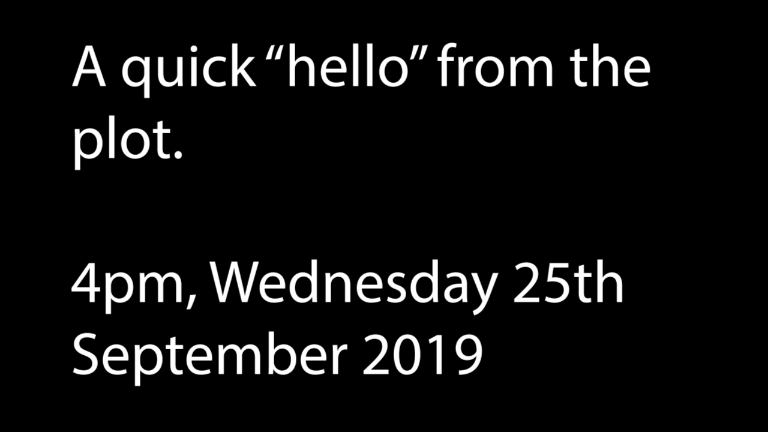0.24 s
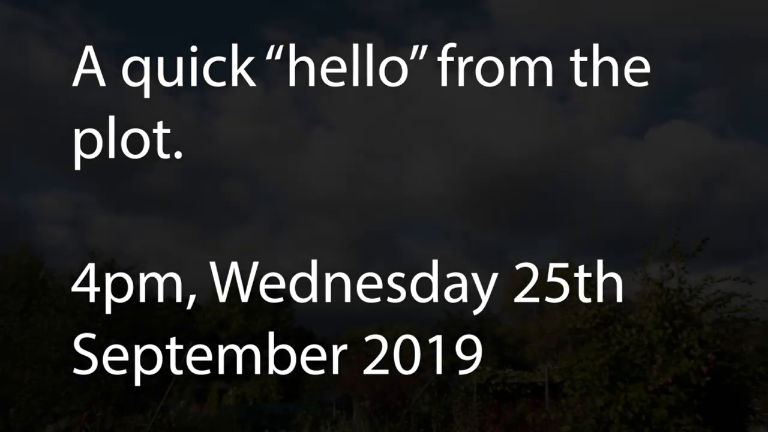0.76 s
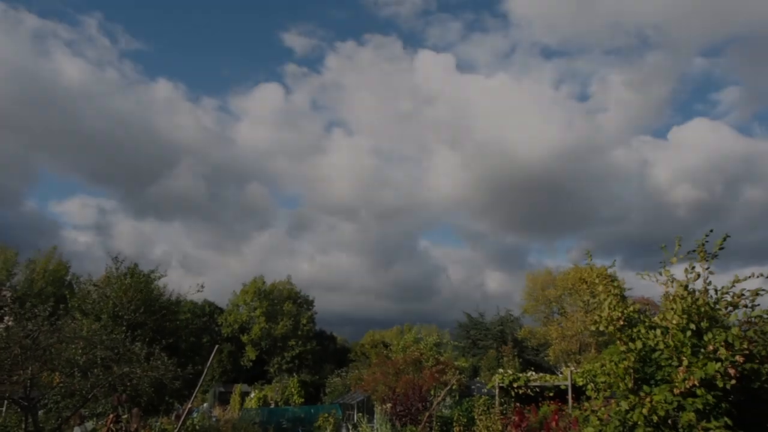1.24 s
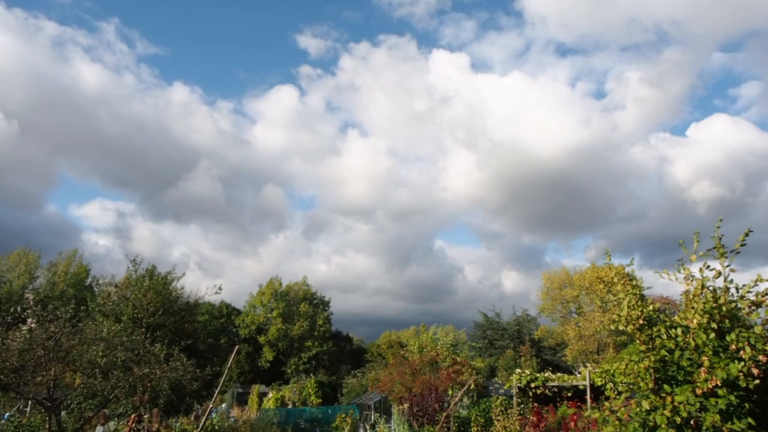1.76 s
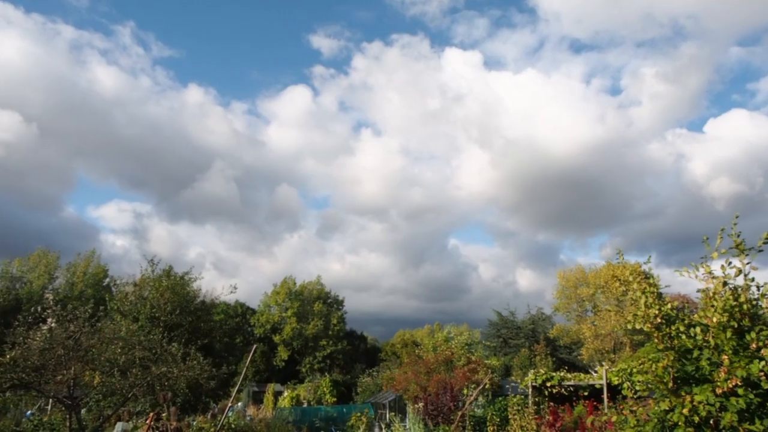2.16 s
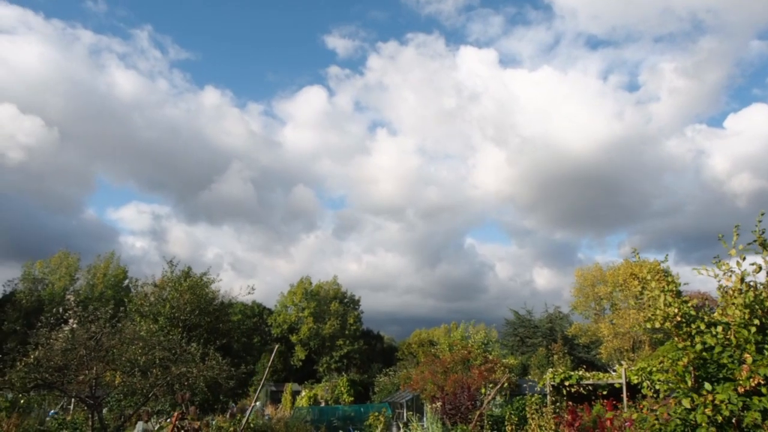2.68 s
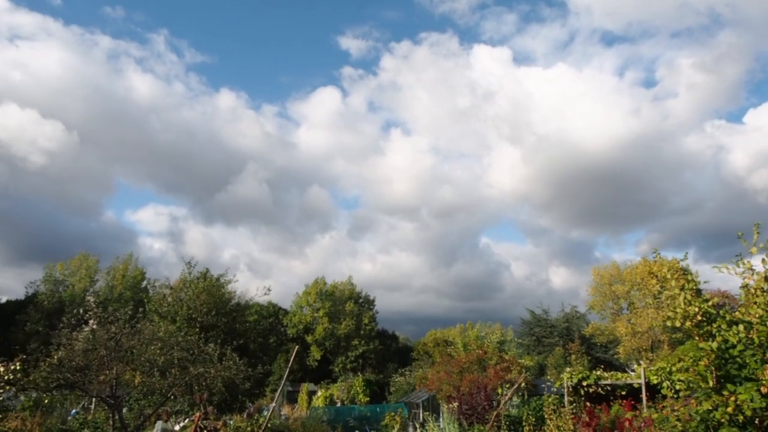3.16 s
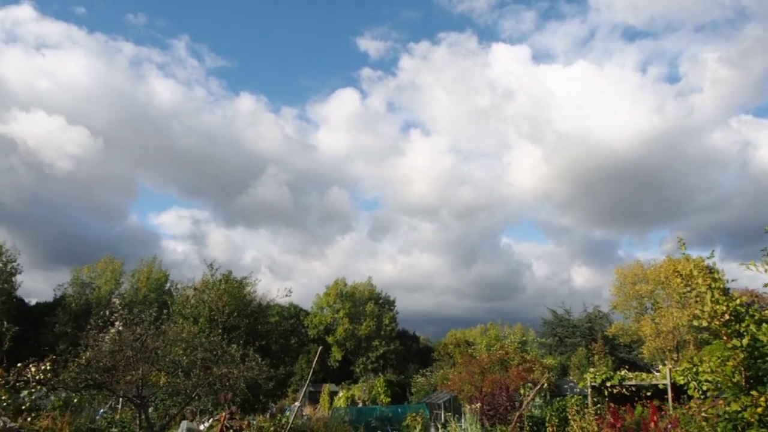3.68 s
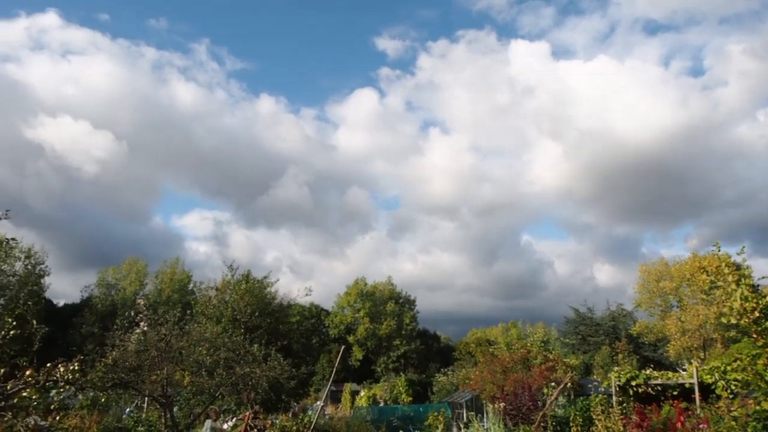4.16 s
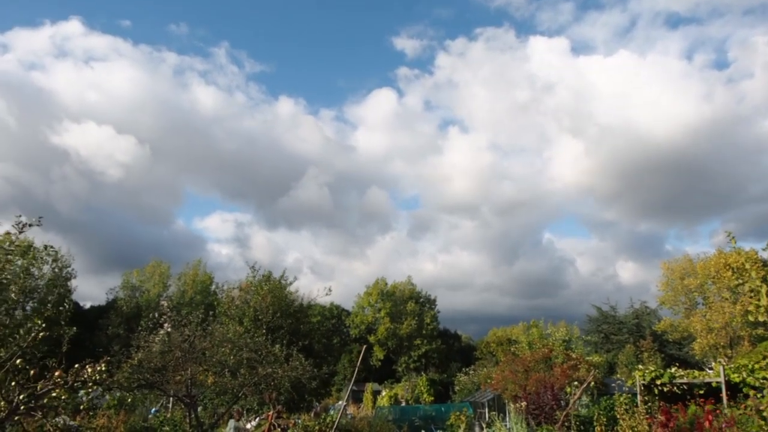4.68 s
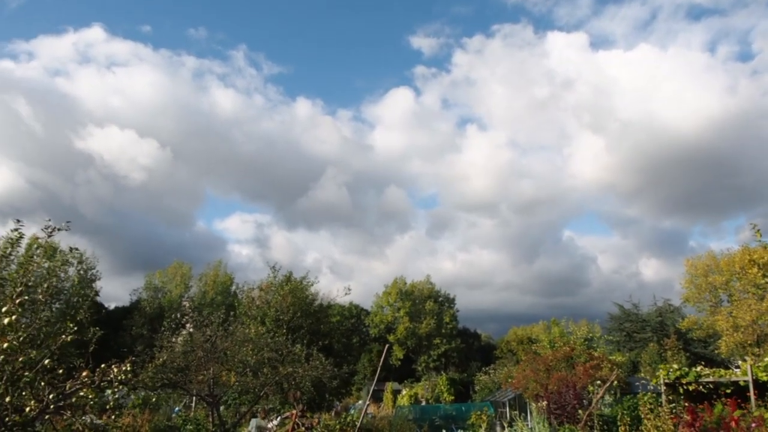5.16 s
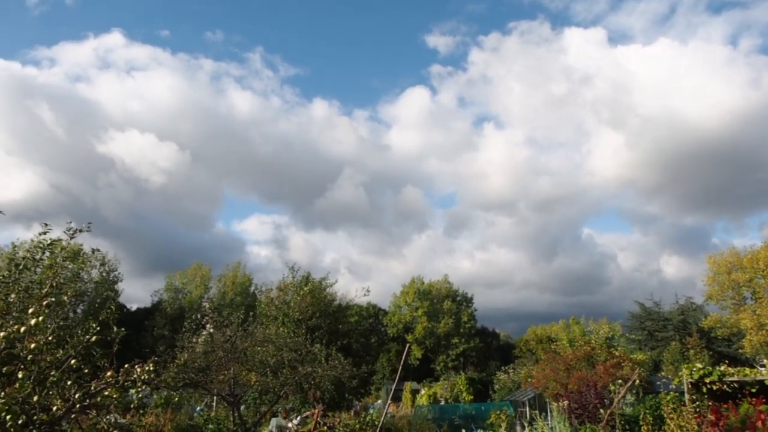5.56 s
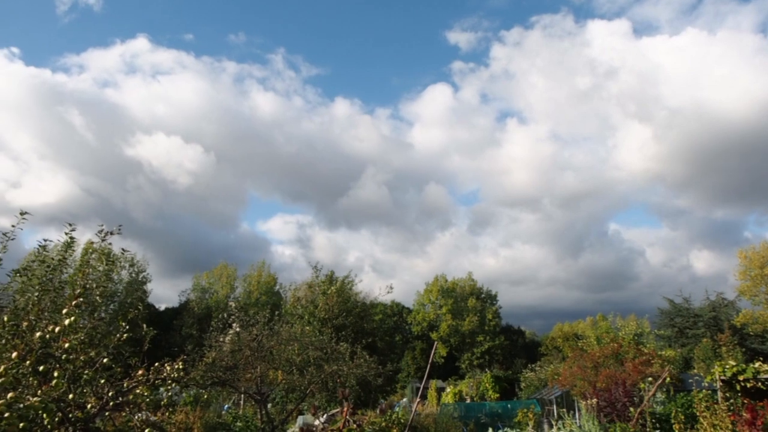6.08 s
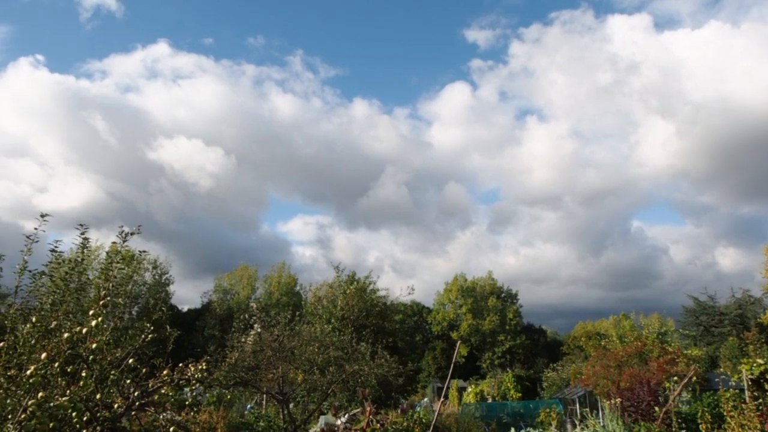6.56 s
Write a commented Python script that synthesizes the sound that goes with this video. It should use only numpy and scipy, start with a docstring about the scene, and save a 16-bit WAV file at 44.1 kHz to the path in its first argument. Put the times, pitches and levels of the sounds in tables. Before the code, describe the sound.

After a brief silence, outdoor air fades in: steady leaf hiss slightly to the right and a dull distant roar slightly to the left. Strong gusts flutter and thump directly on the stereo microphone, first left, later right, then left again. They stop before four seconds, leaving rustling trees, a faint quick bird chirp, a soft knock, weaker left-side buffeting and another couple of bird notes.

```python
"""Wind among garden trees at two close microphone ports, rising from silence by a straight fade-in
that raised early levels of roar and leaves fill out. Leaf hiss (shaped noise and ticks, from the right)
and a dull far roar (shaped noise, from the left) run throughout. Eddies, made as short uneven pressure
swings, thump each port on its own, strongly up to 3.8 s. Then come faint gliding bird whistles near 4 s,
a soft knock of damped modes at 4.7 s, weaker eddies chiefly on the left, and more bird notes from 6 s."""
import sys
import numpy as np
from scipy import signal
from scipy.fft import rfft, irfft
from scipy.io import wavfile
from scipy.ndimage import uniform_filter1d

SR = 44100
rng = np.random.default_rng(int(sys.argv[2]) if len(sys.argv) > 2 else 0)


def wav_record(signal):
    """Record a signal, one row per channel, as 16-bit PCM in the file named by sys.argv[1]."""
    frames = np.transpose(np.atleast_2d(signal))
    bounded = np.clip(frames, -1, 1)
    # unit amplitude maps onto the largest positive 16-bit level
    quanta = np.round(bounded * 32767).astype(np.int16)
    wavfile.write(sys.argv[1], SR, quanta)


def voltage_ratio(decibels):
    """Convert decibels (scalar or array-like) to amplitude ratios, 20 dB per decade."""
    exponent = np.asarray(decibels, float) / 20
    return 10 ** exponent


N = 301203
T = np.arange(N) / SR


def evened(x):
    """Normalization: scales a signal to an rms of 1."""
    return x / np.sqrt(np.mean(x ** 2) + 1e-20)


def read(points, hz):
    """Interpolation: reads a curve on a log-frequency axis."""
    f, value = np.transpose(points)
    return np.interp(np.log(hz + 1), np.log(f + 1), value)


def add(mix, s, sound):
    """Superposition: adds a sound to the mix at time s."""
    part = mix[..., round(s * SR):][..., :sound.shape[-1]]
    part += sound[..., :part.shape[-1]]


# A quick flick inside each strong eddy: level relative to the eddy at -8 dB, further dB per dB of eddy
# level, and width in flutter periods.
SNAP_DB, SNAP_GROWTH, SNAP_TURNS = -8.5, 0.3, 0.081


def eddy(hz, ms, chance, sharp, wander, spread, push, snap=0):
    """Phase modulation: uneven, peaky pressure swings on a push of half their rate, in a Gaussian bell."""
    u = np.arange(-4 * spread * ms, 4 * spread * ms, 1000 / SR) / ms
    uneven = u + wander * np.sin(np.pi * (u + 2 * chance[1]))
    turn = 2 * np.pi * (chance[0] + hz * ms / 1000 * uneven)
    swing = np.cos(turn + sharp * np.sin(turn + 2 * np.pi * chance[2]))
    bell = np.exp(-.5 * (u / spread) ** 2)
    slow_push = push * np.sqrt(bell) * np.cos(turn / 2 + 2 * np.pi * chance[2])
    x = (u + chance[1] * spread / 2) * ms * hz / 1000 / SNAP_TURNS
    flick = x * np.exp(.5 - .5 * x ** 2)  # one push and pull, peaking at 1
    return snap * flick + bell * swing + slow_push


# The strongest eddies. Each row: centre in seconds, port, level of the swing before the low cut in dB,
# flutter in Hz, length scale in ms.
STRONG_EDDIES = [(0.935, "left", -22, 141, 18), (1.078, "left", -21, 170, 19),
                 (1.111, "left", -15, 173.8, 8.2), (1.136, "left", -20, 210, 12.6),
                 (1.198, "left", -21, 152, 18), (1.224, "left", -20.5, 194, 21),
                 (1.253, "left", -19, 296.4, 5), (1.265, "left", -20.5, 170, 10),
                 (1.354, "left", -27, 170, 7.9), (1.375, "left", -18, 192, 9.2),
                 (1.4, "left", -14, 138, 25.5), (1.434, "left", -14, 340, 11), (1.468, "left", -20, 150, 7),
                 (1.48, "left", -23, 150, 8.9), (1.569, "left", -25, 174, 16),
                 (1.684, "left", -20, 145, 8.9), (1.701, "left", -13.5, 133, 14.4),
                 (2.094, "right", -17, 170, 6.5), (2.158, "left", -9.5, 168, 6.7),
                 (2.172, "left", -16, 192, 11), (2.187, "left", -17.5, 116, 18),
                 (2.206, "left", -16, 141, 14), (2.232, "left", -14.5, 186, 9.8),
                 (2.281, "left", -25, 209, 7.6), (2.885, "right", -16, 241, 5.9),
                 (2.953, "right", -13.5, 188, 13), (2.996, "right", -15, 270, 16),
                 (3.08, "right", -12.5, 305, 6), (3.096, "right", -15, 318, 14.8),
                 (3.11, "right", -15, 372, 8.9), (3.141, "right", -31, 169, 8),
                 (3.177, "right", -16, 286, 7), (3.184, "left", -19, 165, 24),
                 (3.232, "right", -23, 177, 18), (3.336, "left", -18.5, 180, 7.4),
                 (3.374, "left", -19, 241, 8.8), (3.4, "left", -17, 189, 15),
                 (3.446, "left", -17.5, 216, 6.2), (3.579, "left", -21, 143, 16),
                 (3.662, "left", -22, 90, 13), (3.718, "left", -15.5, 157, 10.3),
                 (3.744, "left", -22.5, 130, 10), (4.58, "right", -32.5, 75, 19),
                 (5.498, "left", -34, 94, 17), (5.714, "left", -29, 123, 11),
                 (5.827, "left", -26.5, 121, 13.4), (5.85, "left", -28, 125, 7.4),
                 (6.061, "left", -31, 142, 16), (6.113, "left", -30, 118, 14.6),
                 (6.202, "left", -30.5, 100, 11.5), (6.251, "left", -35, 130, 6.2),
                 (6.329, "left", -31, 150, 5.5), (6.589, "left", -28.5, 130, 12)]


def strong_eddies():
    """Turbulent pressure: single large eddies tumble over one port at a time."""
    out = np.zeros((2, N))
    for (s, port, db, hz, ms), chance in zip(STRONG_EDDIES, rng.random((len(STRONG_EDDIES), 3))):
        sharp = np.clip(1.0 + 0.033 * (db + 4.5), 0, 2)  # stronger eddies swing more sharply
        snap = voltage_ratio(SNAP_DB + SNAP_GROWTH * (db + 8))
        swing = eddy(hz, ms, chance, sharp, wander=0.064, spread=0.34, push=0.33, snap=snap)
        add(out[int(port == "right")], s - len(swing) / 2 / SR, voltage_ratio(db) * swing)
    return out


# Level of the crowd of small eddies before the low cut.
# Each row: time in seconds, left port in dB, right port in dB.
GUST_LEVELS = [(0.7, -67, -60), (0.85, -31.5, -55), (1.2, -27, -52), (1.6, -36.5, -36), (1.85, -41, -42),
               (2.05, -38.5, -36), (2.2, -28.5, -39), (2.4, -32.5, -42), (2.5, -60, -87), (2.8, -68, -40.5),
               (3.1, -31, -20), (3.3, -39, -32.5), (3.55, -31, -37), (3.74, -41, -45), (3.79, -54, -35),
               (3.88, -41, -34), (4.1, -61, -54), (4.25, -62, -69), (5.4, -66, -70), (5.6, -47, -66),
               (5.85, -42, -64), (5.95, -49, -68), (6.15, -40, -61), (6.3, -53, -66), (6.38, -40, -64),
               (6.46, -54, -64), (6.6, -38.5, -69), (6.83, -62, -70)]
SMALL_PER_S, SMALL_SPREAD_DB = 190, 5  # mean rate in each port, scale of the random sizes
SMALL_TILT_DB = -2.5  # dB per octave of flutter when the gust level is -22 dB
BRIGHTEN = 0.13  # stronger gusts favour fast flutter: dB per octave per dB
CLUMP_DB = 3  # slow random rise and fall of the sizes, so that the crowd comes in bunches


def small_eddies():
    """Poisson statistics: a random crowd of small eddies whose level and tilt follow the gusts."""
    s, *level_db = np.transpose(GUST_LEVELS)
    gust_db = np.array([np.interp(T, s, db) for db in level_db])
    flutter_hz = np.geomspace(66, 340, num=32)
    kind = rng.integers(0, len(flutter_hz), (2, N))
    size_db = SMALL_SPREAD_DB * np.minimum(rng.exponential(1, (2, N)), 2.5)
    occurs = rng.random((2, N)) < SMALL_PER_S / SR
    tilt_db = SMALL_TILT_DB + BRIGHTEN * np.clip(gust_db + 22, -30, 10)
    bunches = evened(uniform_filter1d(rng.standard_normal((2, N)), size=900, axis=1))
    octaves = np.log2(flutter_hz[kind] / 120)
    size = occurs * voltage_ratio(size_db + tilt_db * octaves + CLUMP_DB * bunches)
    crowd = np.zeros((2, N))
    for k, hz in enumerate(flutter_hz):
        # about one swing each
        swing = eddy(hz, 1300 / hz, rng.random(3), sharp=0.78, wander=0.19, spread=0.58, push=0)
        crowd += signal.oaconvolve(size * (kind == k), swing[None], "same", axes=1)
    return evened(crowd) * voltage_ratio(gust_db)


LOW_CUT_HZ = 57  # the microphone rolls off below this


def buffeting():
    """Wind noise: pressure of air tumbling over each port, through the microphone's high-pass response."""
    pressure = strong_eddies() + small_eddies()
    low_cut = signal.butter(3, LOW_CUT_HZ, "highpass", fs=SR, output="sos")
    return signal.sosfilt(low_cut, pressure)


# Level curves of far roar and leaves, relative to each layer's own level; the raised early points
# fill out the straight fade-in, the rest is slow swell.
# Each row: time in seconds, far roar in dB, leaves in dB.
LAYER_LEVELS = [(0.7, 2.5, 4.5), (1.3, -1, 2), (1.7, -0.9, 1.54), (3.1, -0.3, 0.6), (3.4, -0.8, 2),
                (4.5, 0.34, 0.25), (5.7, -0.5, 0), (6.83, -1, 1.5)]


def layer_levels():
    """Amplitude modulation: level curves in dB of the far roar and the leaves."""
    s, roar_db, leaves_db = np.transpose(LAYER_LEVELS)
    return np.interp(T, s, roar_db), np.interp(T, s, leaves_db)


def airy(colour, alike, left_late_s, patchy_db, flicker_db, right_bright_db=0):
    """Interaural coherence: partly shared noise spectra, with patches and a flicker common to all pitches."""
    frames, hz = N // 128 + 5, np.fft.rfftfreq(512, 1 / SR)
    a, b, c, d, patches = rng.standard_normal((frames, 257, 5)).T
    patches = uniform_filter1d(uniform_filter1d(patches, size=8, axis=0), size=24, axis=1)
    flicker = evened(uniform_filter1d(rng.standard_normal(frames), size=30))
    same = np.clip(read(alike, hz), 0, 1)[:, None]
    late = np.exp(-2j * np.pi * hz * left_late_s)[:, None]
    right, own = a + 1j * b, c + 1j * d
    left = same * late * right + np.sqrt(1 - same ** 2) * own
    # the ports differ in a band around 9 kHz
    band = np.exp(-np.log2(hz / 9000 + 1e-9) ** 2 / 0.15)[:, None]
    port_db = np.array([-.5, .5])[:, None, None] * right_bright_db * band
    level_db = read(colour, hz)[:, None] + patchy_db * evened(patches) + flicker_db * flicker
    z = np.array([left, right]) * voltage_ratio(port_db + level_db)
    return evened(signal.istft(z, nperseg=512, noverlap=384)[1][:, :N])


# Spectrum of the leaves. Each row: frequency in Hz, relative spectral density in dB.
LEAF_SPECTRUM = [(300, -9), (900, -6.5), (1500, -1.5), (2500, -1), (3600, -3.5), (5000, -9), (7000, -12),
                 (8300, -9), (9800, -12), (11500, -19.5), (13500, -22), (16500, -31)]
# Likeness of the leaf hiss in the two ports. Each row: frequency in Hz, coherence from 0 to 1.
LEAF_LIKENESS = [(1000, 0.9), (2200, 0.49), (3300, 0.62), (5000, 0.59), (6000, 0.49), (9500, 0.3),
                 (12000, 0.061)]
LEAVES_DB, RUSTLE_DB = -43, -54.5  # rms of hiss and of ticks, before the level curve


def leaves():
    """Sum of many impacts: a dense hiss, right first, with single leaves ticking as filtered impulses."""
    hiss = airy(LEAF_SPECTRUM, LEAF_LIKENESS, 0.00011, 0.38, 0.58, right_bright_db=1.5)
    size = voltage_ratio(3.1 * np.minimum(rng.exponential(1, (2, N)), 4))
    size *= rng.random((2, N)) < 900 / SR  # 900 ticks per second in each port
    z = rfft(size * rng.choice([-1., 1.], (2, N)), axis=1)
    ticks = irfft(z * voltage_ratio(read(LEAF_SPECTRUM, np.fft.rfftfreq(N, 1 / SR))), N, axis=1)
    level_db = layer_levels()[1] + np.array([[-.4], [.4]])  # right port louder
    return voltage_ratio(level_db) * (voltage_ratio(LEAVES_DB) * hiss + voltage_ratio(RUSTLE_DB) * evened(ticks))


# Spectrum of the far roar. Each row: frequency in Hz, relative spectral density in dB.
ROAR_SPECTRUM = [(25, -13), (60, -13.5), (130, -7), (250, -7.5), (500, -11), (620, -3.5), (820, -2),
                 (1020, -1), (1150, -5.5), (1300, -19), (2000, -17), (4000, -55)]
ROAR_DB = -41.5  # rms before the level curve


def far_roar():
    """Spectral filtering: wind in far treetops, perhaps with a road, dull and nearly alike, left first."""
    flat = airy([(1, 0), (2, 0)], [(150, 0.99), (600, 0.88), (1300, 0.83)], -0.000079, 0.82, 0.2)
    z = rfft(flat, axis=1)
    coloured = irfft(z * voltage_ratio(read(ROAR_SPECTRUM, np.fft.rfftfreq(N, 1 / SR))), N, axis=1)
    level_db = layer_levels()[0] + np.array([[.4], [-.4]])  # left port louder
    return voltage_ratio(ROAR_DB + level_db) * evened(coloured)


# Bird notes. Each row: start in seconds, length in ms, start pitch in Hz, end pitch in Hz,
# direct level averaged over the ports in dB, left minus right in dB.
BIRD_NOTES = [(3.963, 33, 5150, 5100, -51, -10), (3.996, 28, 4550, 4000, -46, 0),
              (4.031, 14, 3650, 4020, -49, -10), (4.042, 11, 4000, 4080, -42, -12),
              (5.99, 15, 2800, 4300, -49, -5), (6.021, 11, 4270, 3750, -45, -6),
              (6.03, 11, 3800, 4600, -45, -2), (6.042, 11, 3950, 3600, -48, -8),
              (6.51, 84, 3300, 2980, -50, 0)]


def birds():
    """Frequency modulation: short gliding whistles, smeared by a few echoes among the trees."""
    out = np.zeros((2, N))
    for s, ms, start_hz, end_hz, db, pan_db in BIRD_NOTES:
        hz = np.linspace(start_hz, end_hz, round(ms * SR / 1000))
        note = np.sin(2 * np.pi * np.cumsum(hz) / SR) * signal.windows.tukey(len(hz), .85)
        add(out, s, voltage_ratio(db + np.array([[pan_db / 2], [-pan_db / 2]])) * note)
    echoes = np.zeros((2, 3000))
    echoes[:, 0] = 1  # direct sound
    echoes[[[0], [1]], rng.integers(200, 3000, (2, 8))] = 0.12 * rng.choice([-1., 1.], (2, 8))
    return signal.oaconvolve(out, echoes, axes=1)[:, :N]


KNOCK_S, KNOCK_DB = 4.7, -34  # start, and level added to both modes
# Each row: frequency in Hz, relative level in dB, time to decay by 60 dB in seconds.
KNOCK_MODES = [(130, -3, 0.13), (550, 5.5, 0.072)]


def knock():
    """Modal decay: one soft dull bump nearby, two damped modes with a gradual onset, alike in both ports."""
    t, out = np.arange(SR // 5) / SR, np.zeros(N)
    ring = sum(voltage_ratio(db - 60 * t / t60) * np.sin(2 * np.pi * hz * t) for hz, db, t60 in KNOCK_MODES)
    onset = 1 - np.exp(-t / 0.0085)
    add(out, KNOCK_S, voltage_ratio(KNOCK_DB) * ring * onset)
    return out


def scene():
    """Superposition: everything that reaches the two ports."""
    return buffeting() + leaves() + far_roar() + birds() + knock()


def band_limit(x):
    """A steep low-pass at the top of the band."""
    return signal.sosfilt(signal.butter(12, 16180, fs=SR, output="sos"), x)


FADE_START_S, FADE_END_S = 0.67, 1.432
OFFSET = -0.0032  # steady converter offset before the fade, full scale = 1


def record(dry):
    """Linear gain ramp: the converter's offset joins the sound, and both fade in along a straight line."""
    fade = np.clip((T - FADE_START_S) / (FADE_END_S - FADE_START_S), 0, 1)
    return band_limit((dry + OFFSET) * fade)


dry = scene()
out = record(dry)
wav_record(out)
```